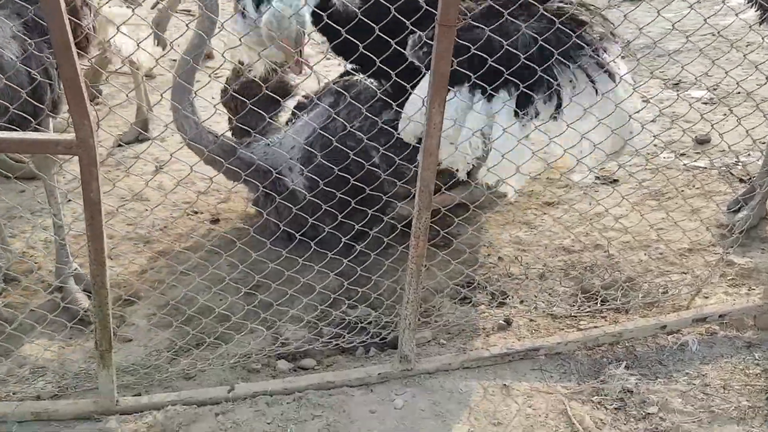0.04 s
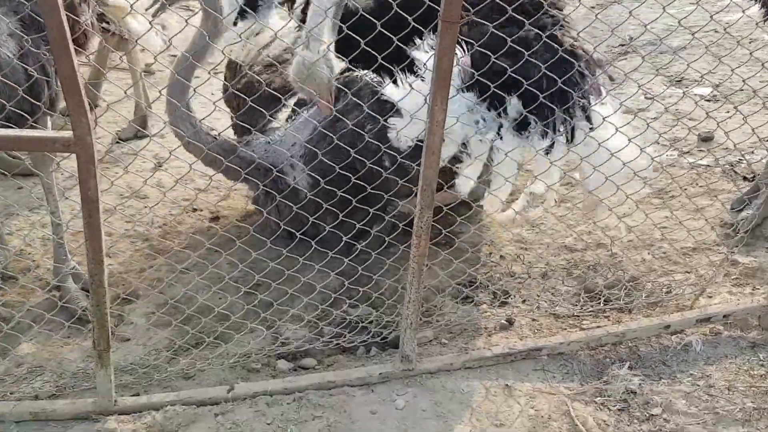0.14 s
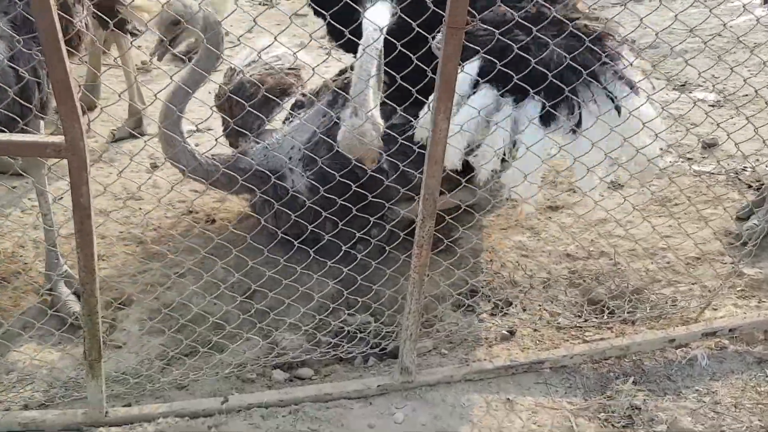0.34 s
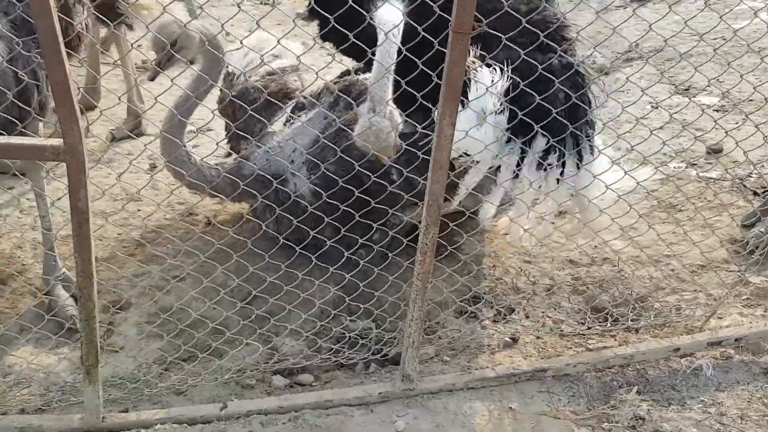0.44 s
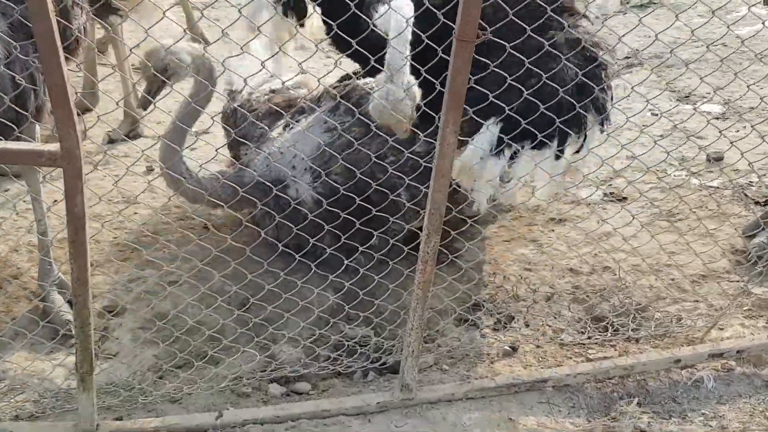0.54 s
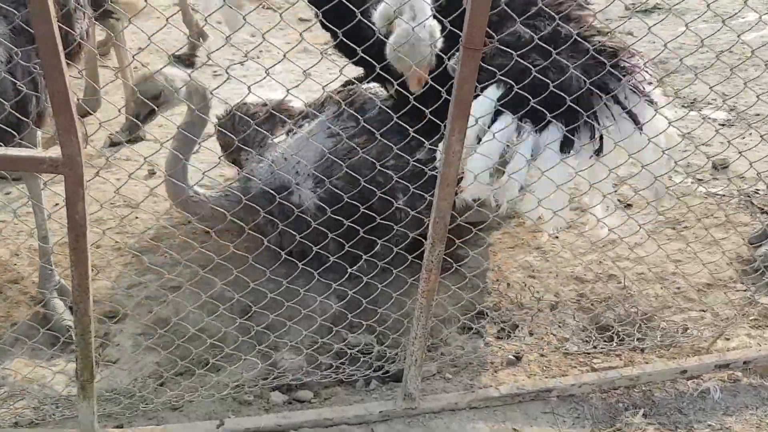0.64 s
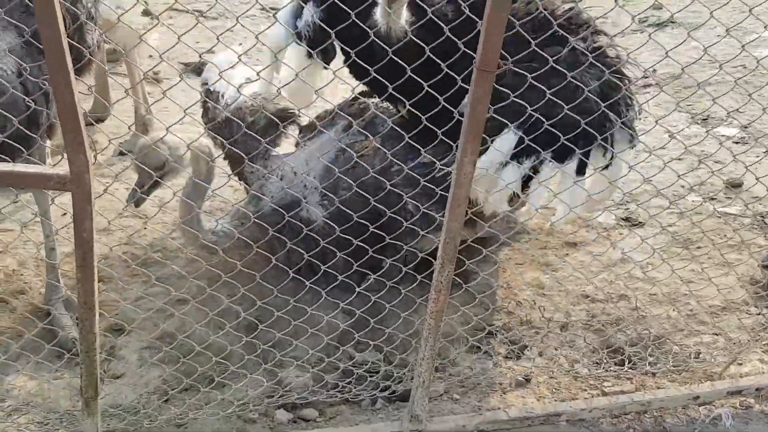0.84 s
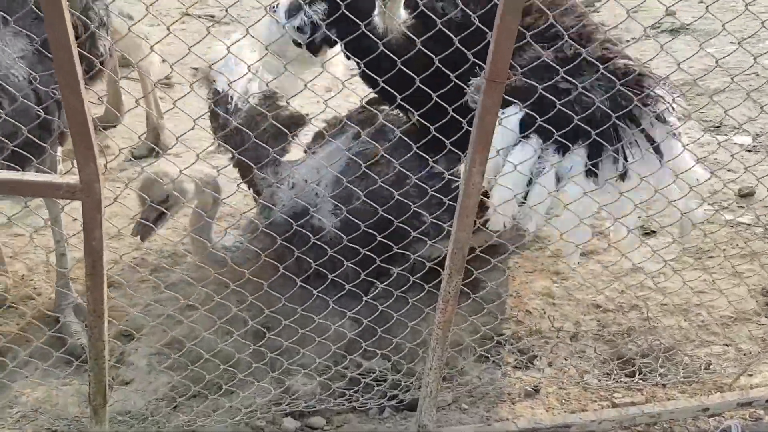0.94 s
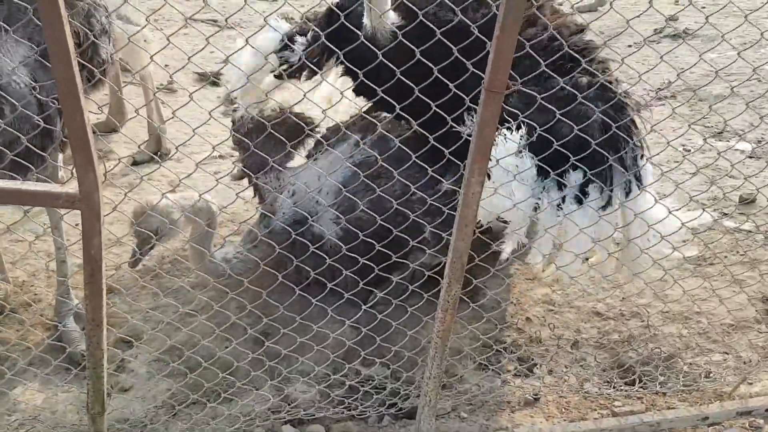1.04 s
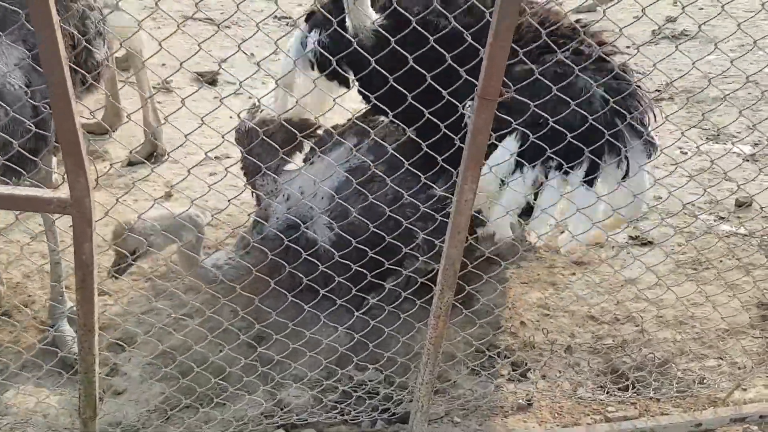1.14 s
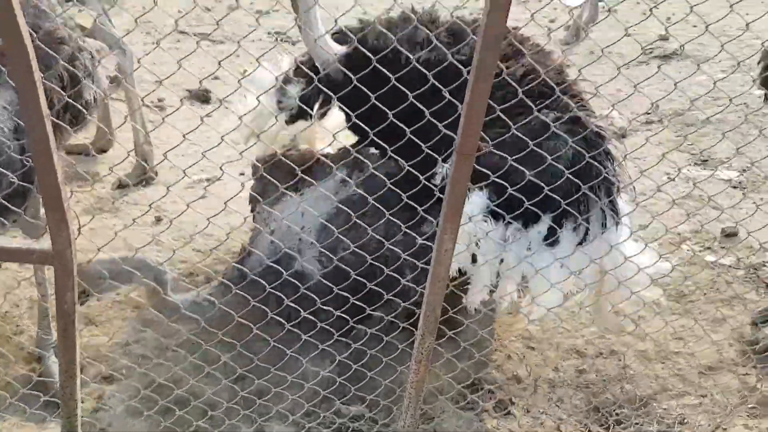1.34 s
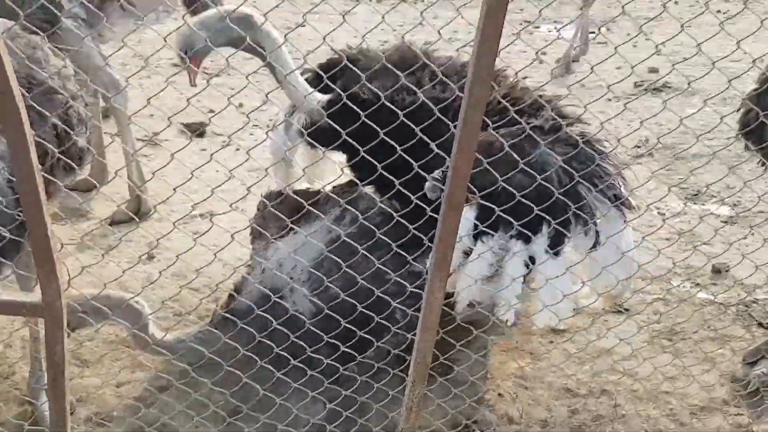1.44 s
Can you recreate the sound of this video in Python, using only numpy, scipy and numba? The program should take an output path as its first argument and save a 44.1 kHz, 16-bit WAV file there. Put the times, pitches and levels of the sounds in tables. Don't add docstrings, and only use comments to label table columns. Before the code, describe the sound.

One low ostrich groan swells and sinks close to a stereo microphone, with evenly spaced hollow wing thumps, small ticks and feather rustles, over quiet rumble and hiss of an open dirt yard.

```python
import sys
import numpy as np
from scipy import signal
from scipy.io import wavfile
from numba import njit

SR = 44100
rng = np.random.default_rng(int(sys.argv[2]) if len(sys.argv) > 2 else 0)


def generate_wav(sig):
    pcm = np.round(np.clip(np.atleast_2d(sig).T, -1, 1) * 32767).astype(np.int16)
    wavfile.write(sys.argv[1], SR, pcm)


def invert_db(x):
    u = np.asarray(x, float) / 20
    return 10 ** u


N = 66150
VOICE_PAN_DB, VOICE_LAG_S = -1.2, 0.00002


def rms_one(x):
    return x / np.sqrt(np.mean(x ** 2) + 1e-20)


def at_hz(points, hz):
    point_hz, values = np.transpose(points)
    return np.interp(np.log(hz), np.log(point_hz), values)


def drift(rate_hz):
    r = np.exp(-80 * np.pi * rate_hz / SR)
    slow = signal.lfilter([1], [1, -2 * r, r * r], rng.standard_normal(N // 40 + 2002))[2000:]
    return np.interp(np.arange(N) / 40, np.arange(len(slow)), rms_one(slow))


@njit
def resonate(x, turn, r):
    y = np.zeros(len(x))
    for i in range(2, len(x)):
        drive = (1 - r * r) / 2 * (x[i] - x[i - 2])
        y[i] = drive + 2 * r * np.cos(turn[i]) * y[i - 1] - r * r * y[i - 2]
    return y


def tube(x, hz, width_hz):
    return resonate(x + 1e-18, 2 * np.pi * hz / SR * np.ones(N), np.exp(-np.pi * width_hz / SR))


def double_tube(x, hz, width_hz):
    return tube(tube(x, hz, width_hz), hz, width_hz)


def low_pass(x, hz):
    return signal.sosfilt(signal.butter(2, hz, fs=SR, output="sos"), x)


def band(x, low, high):
    return signal.sosfilt(signal.butter(2, [low, min(high, 0.45 * SR)], "band", fs=SR, output="sos"), x)


def knock(s, db, hz, t60):
    t = np.maximum(np.arange(N) / SR - s, 0)
    onset = np.minimum(0.5 + hz * t, 1)
    return -invert_db(db - 60 * t / t60) * onset * np.sin(2 * np.pi * hz * t)


def placed(x, pan_db, lag_s):
    late = np.interp(np.arange(N) - lag_s * SR, np.arange(N), x)
    return np.array([x * invert_db(pan_db / 2), late * invert_db(-pan_db / 2)])


# (frequency [Hz], likeness [0..1])
LIKENESS = [(60, .97), (300, 0.94), (1000, 0.21), (2500, 0.05), (5000, 0.017)]
# (frequency [Hz], level difference [dB])
LEAN = [(60, -3), (400, -0.5), (1400, -4.2), (2800, -1.5), (5000, -7.5), (9000, -6), (14000, 2.5)]


def spread(white, hz):
    alike = np.clip(at_hz(LIKENESS, hz), 0, 1)
    lean = at_hz(LEAN, hz) / 2
    middle = np.sqrt(1 + alike) * white[0]
    side = np.sqrt(1 - alike) * white[1] * [[1], [-1]]
    return (middle + side) * invert_db(np.array([[lean], [-lean]]))


# (time [s], pitch [Hz], level [dB], brightness [dB], neck opening [dB])
GROAN = [
    (0.199, 69, -34, -17.5, 3),
    (.27, 82.58, -31, -15.5, -0.5),
    (0.339, 86.02, -29.5, -16.5, -2.5),
    (0.492, 89.25, -29, -13.5, -4.5),
    (.555, 86.97, -30, -17, -0.7),
    (.64, 74.17, -30, -17, 3.5),
    (.73, 58.36, -36.5, -17.5, 9.5),
    (.83, 49.85, -38.5, -26, 3),
    (0.906, 44.5, -47, -29, -10.5),
]
# (frequency [Hz], width [Hz], level [dB], share of pitch followed [0..1])
NECK_SAC = [(176, 66, 0, .2), (345, 105, -12, .52), (640, 150, -23, .03)]
# (frequency [Hz], width [Hz], level [dB])
THROAT = [(733, 160, -7.5), (963, 131, 6), (1422, 83, 3.5), (1743, 153, 3.5), (2530, 614, -2.5),
          (2615, 79, 4), (3760, 400, -9)]


def neck_sac(pulses, stretch, open_db):
    soft = low_pass(pulses, 830)
    soft = soft - 0.93 * tube(soft, 244 * stretch ** 0.33, 45)
    out = 0
    for k, (hz, width_hz, db, follows) in enumerate(NECK_SAC):
        gain = invert_db(db + open_db * (k > 0))
        out = out + gain * double_tube(soft, hz * stretch ** follows, width_hz)
    return rms_one(out)


def upper_throat(raspy, stretch):
    out = 0
    for k, (hz, width_hz, db) in enumerate(THROAT):
        out = out + (-1) ** k * invert_db(db) * tube(raspy, hz * stretch ** 0.93, width_hz)
    return rms_one(band(out, 500, 3300))


def groan():
    t = np.arange(N) / SR
    s, *columns = np.transpose(GROAN)
    hz, level_db, bright_db, open_db = [np.interp(t, s, c) for c in columns]
    turns = 0.3 + np.cumsum(hz * (1 + 0.0034 * drift(25))) / SR
    stretch = hz / 88

    def pulse_train(lead_s):
        phase = 2 * np.pi * (turns + hz * lead_s)
        return rms_one(sum(np.cos(k * phase) for k in range(1, 56))) * invert_db(1.8 * drift(30))

    open_s, closing_lead_s = 0.00213, 0.00042
    pulses = pulse_train(0)
    opening = pulse_train(open_s + closing_lead_s)
    closing = pulse_train(closing_lead_s)
    gate = np.exp(1.05 * np.cos(2 * np.pi * (turns + 0.045)))
    breath = rms_one(band(gate * rng.standard_normal(N), 300, 4000))
    raspy = opening + 0.49 * closing + 0.33 * breath

    chest_db = -2 + 15 * np.log2(hz / 79.3)
    chest = invert_db(chest_db) * np.cos(2 * np.pi * (turns - 0.17))
    attack = np.clip((t - s[0]) / 0.014, 0, 1)
    release = np.clip((s[-1] - t) / 0.01, 0, 1)
    on = invert_db(level_db) * attack * release

    body = placed(on * (neck_sac(pulses, stretch, open_db) + chest), VOICE_PAN_DB, VOICE_LAG_S)
    bright = placed(on * invert_db(bright_db + 2) * upper_throat(raspy, stretch), -1, 0.00004)
    echo_s = (0.00144, 0.00223)
    echo = np.array([np.roll(v, round(lag * SR)) for v, lag in zip(bright, echo_s)])
    return body + bright + invert_db(-20.5) * echo


# (time [s], peak level [dB], tuning ratio)
THUMPS = [
    (0.176, -34, 0.88),
    (.462, -31, 1.07),
    (.7575, -32.5, 1.05),
    (1.0454, -31.5, 1.004),
    (1.3218, -30.5, 1.015),
]
# (frequency [Hz], level [dB], 60 dB decay [s])
THUMP_BODY = [(147, -3.5, .04), (329, 1.5, .03), (481, -6, 0.025), (653, 2, 0.024), (750, -5, 0.024)]


def thumps():
    out = 0
    for s, db, ratio in THUMPS:
        for hz, own_db, t60 in THUMP_BODY:
            out = out + knock(s, db + own_db, hz * ratio, t60)
    return low_pass(out, 1040)


# (time [s], level [dB], frequency [Hz], 60 dB decay [s])
TICKS = [(.02, -32, 244, 0.019), (0.095, -39.5, 293, 0.052), (0.944, -39.5, 591, 0.015),
         (1.085, -45, 1260, 0.017), (1.178, -33.5, 2550, 0.0021), (1.1772, -41.5, 4700, 0.0048),
         (.922, -44, 12800, 0.002075), (0.579, -48, 12500, .002), (1.232, -34.5, 262, 0.02),
         (1.356, -26, 283, 0.01), (1.378, -41, 1900, 0.02)]


def ticks():
    return sum(knock(*row) for row in TICKS)


# (time [s], length [s], level [dB], centre frequency [Hz])
RUSTLES = [(0.176, 0.15, -58, 3860), (0.534, 0.17, -57, 4200), (0.876, 0.043, -60, 3420),
           (1.158, 0.16, -50, 3300), (1.228, 0.19, -59.5, 6100), (1.12, 0.32, -70, 1430),
           (1.294, 0.24, -54.5, 2160), (.52, .17, -71, 12500), (0.805, 0.09, -70, 12260),
           (1.215, 0.11, -70.5, 12000), (1.283, 0.15, -61.5, 13300), (1.397, 0.15, -65, 13000)]


def rustles():
    out, t = 0, np.arange(N) / SR
    for s, length, db, hz in RUSTLES:
        hits = rng.random((2, N)) < 3500 / SR
        grains = rng.standard_normal((2, N)) * (0.18 + hits)
        progress = np.clip((t - s) / length, 0, 1)
        swell = np.sin(np.pi * progress ** 1.34) ** 0.65 * invert_db(0.83 * drift(30))
        reach = 2 ** (0.76 * min(1, 4000 / hz))
        out = out + invert_db(db) * swell * rms_one(spread(band(grains, hz / reach, hz * reach), hz))
    return out


# (frequency [Hz], density [dB])
YARD_LOW = [(32, -42), (55, -2), (204, -4), (467, -16.5), (531, -11), (604, -15), (817, -13.5),
            (2500, -16.5), (3250, -29.5), (5500, -120)]
# (frequency [Hz], density [dB])
YARD_HIGH = [(2000, -30.5), (2900, -8.5), (4300, -2.5), (5500, -14.5), (7500, -1), (8400, -12), (9200, -31),
             (13500, -12), (15700, -24)]


def yard_noise(spectrum, patchy_db):
    out, together = 0, drift(2.1)
    lowest, highest = spectrum[0][0], spectrum[-1][0]
    edges = np.geomspace(lowest, highest, 1 + round(4 * np.log2(highest / lowest)))
    white = rng.standard_normal((2, 2, N + 8000))
    for k, (low, high) in enumerate(zip(edges, edges[1:])):
        hz = np.sqrt(low * high)
        gain = invert_db(at_hz(spectrum, hz) + patchy_db * (0.5 * together + drift(12.7)))
        settled = band(white[k % 2], low, high)[:, 8000:]
        out = out + gain * spread(settled, hz)
    return rms_one(out)


def yard():
    left, right = yard_noise(YARD_LOW, patchy_db=3.78)
    low = np.array([left, np.roll(right, round(0.00022 * SR))])
    return invert_db(-48) * low + invert_db(-59) * yard_noise(YARD_HIGH, patchy_db=1.35)


def hum():
    deep = rms_one(double_tube(rng.standard_normal(N), 47.9, 5.4))
    rumble = rms_one(double_tube(rng.standard_normal(N), 185.3, 25))
    return invert_db(-52.5) * deep + invert_db(-59) * rumble


def scene():
    near = placed(thumps() + ticks(), VOICE_PAN_DB, VOICE_LAG_S)
    return groan() + near + rustles() + yard() + hum()


def band_limit(x):
    return signal.sosfilt(signal.butter(12, 15730, fs=SR, output="sos"), x)


def record(dry):
    mix = signal.sosfilt(signal.butter(4, 39, "high", fs=SR, output="sos"), dry)
    return band_limit(mix)


dry = scene()
out = record(dry)
generate_wav(out)
```